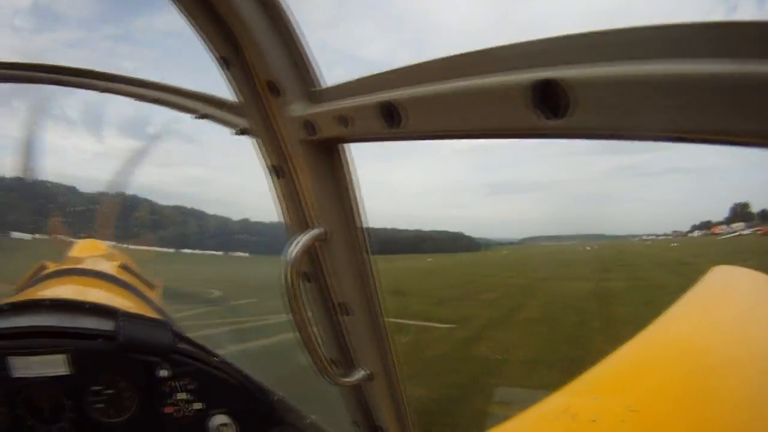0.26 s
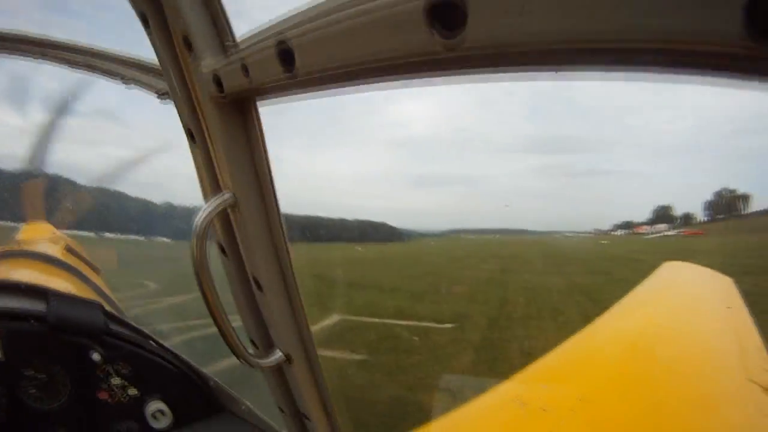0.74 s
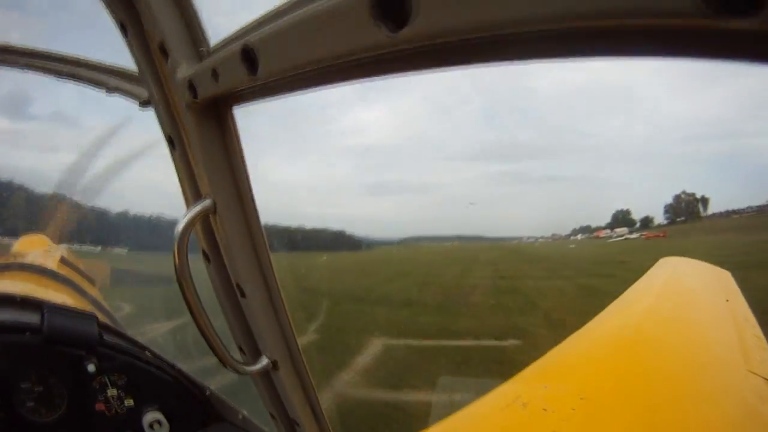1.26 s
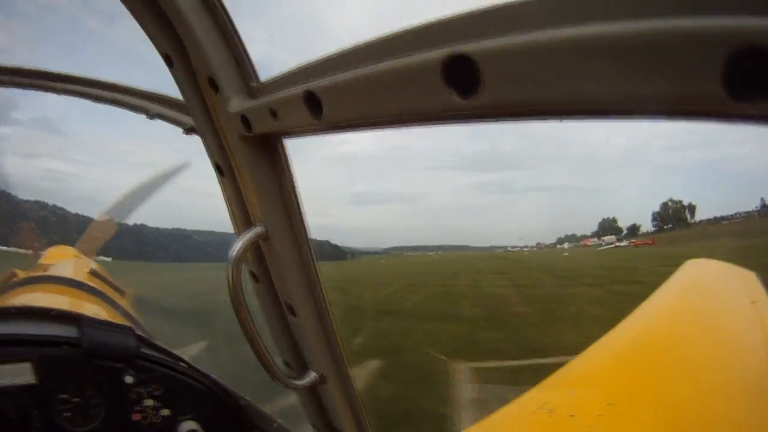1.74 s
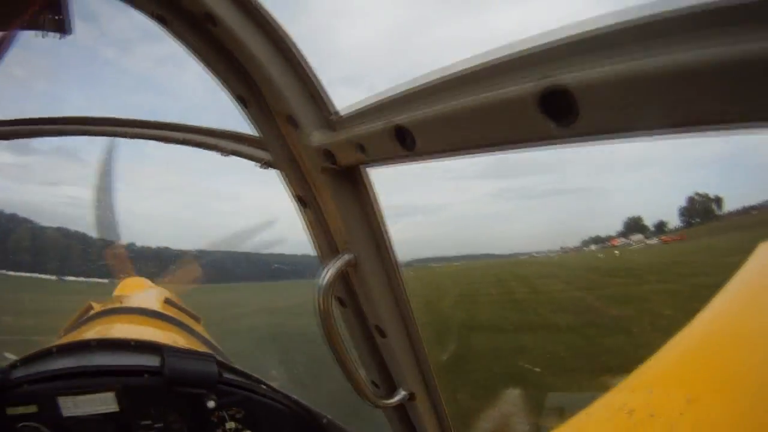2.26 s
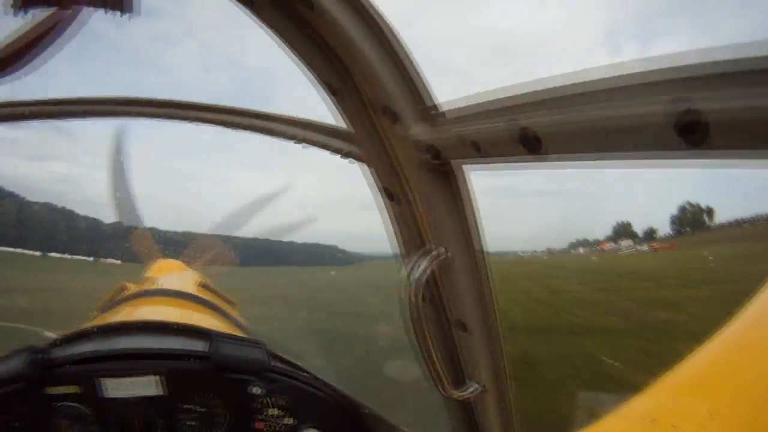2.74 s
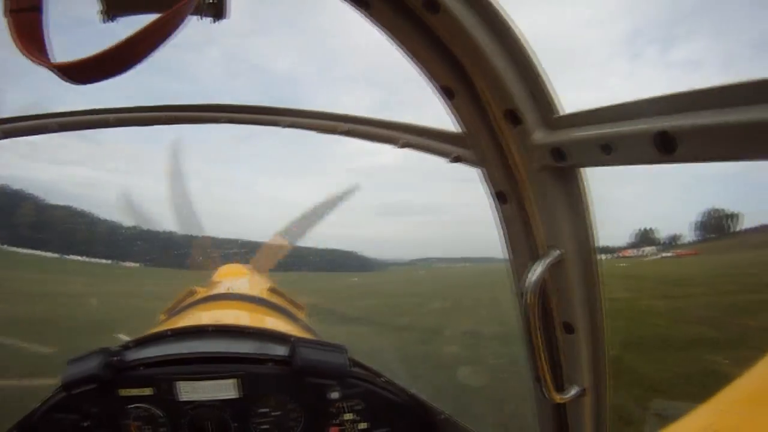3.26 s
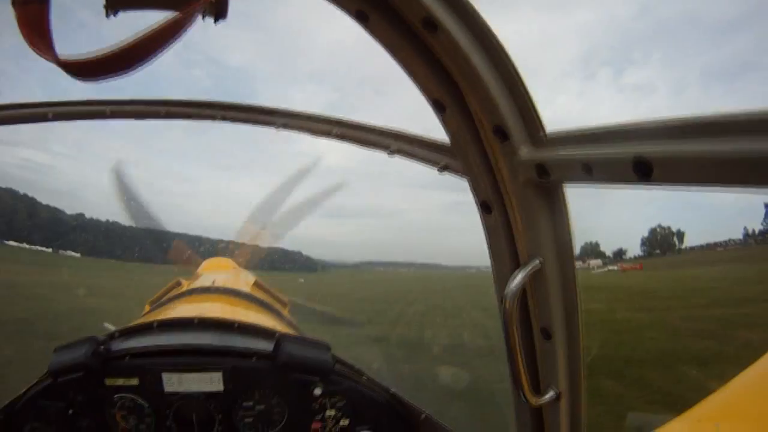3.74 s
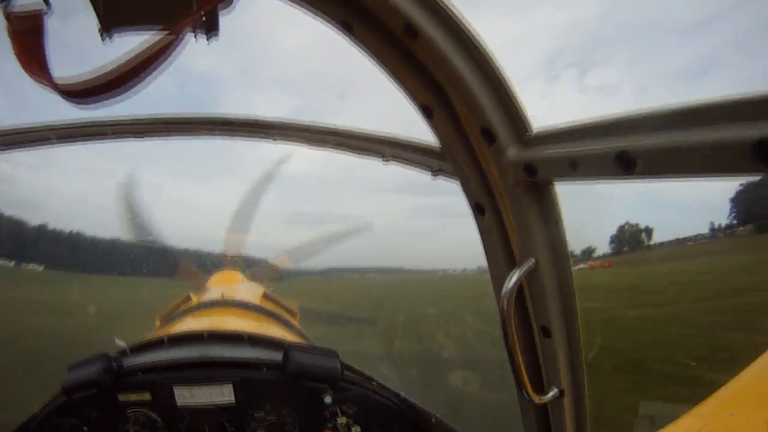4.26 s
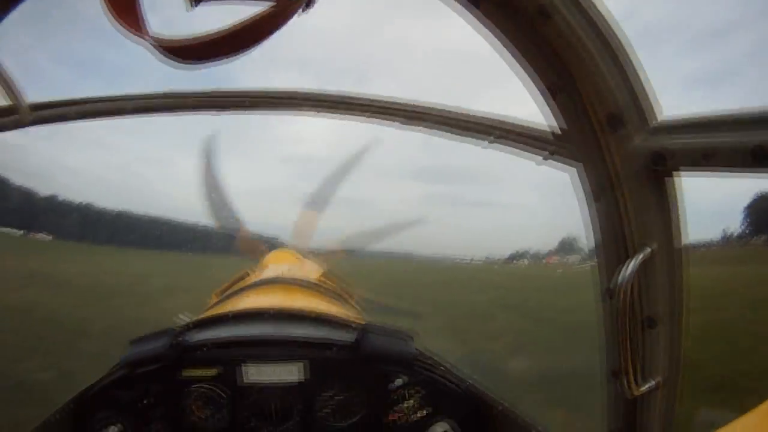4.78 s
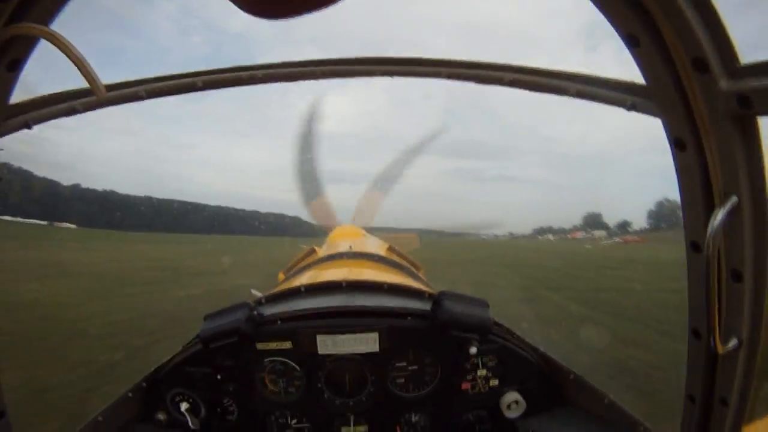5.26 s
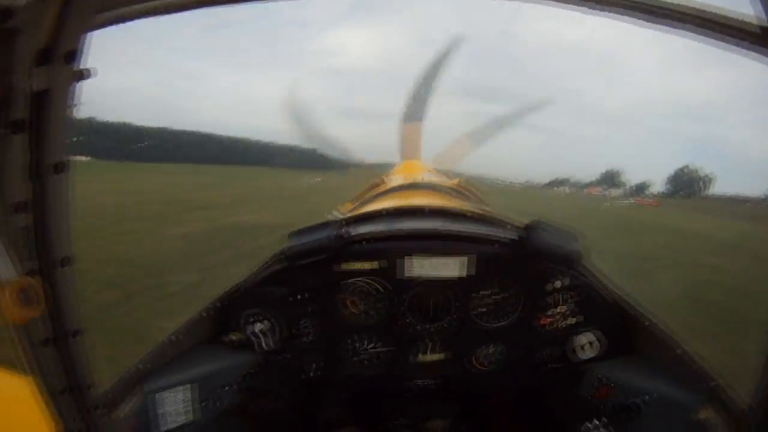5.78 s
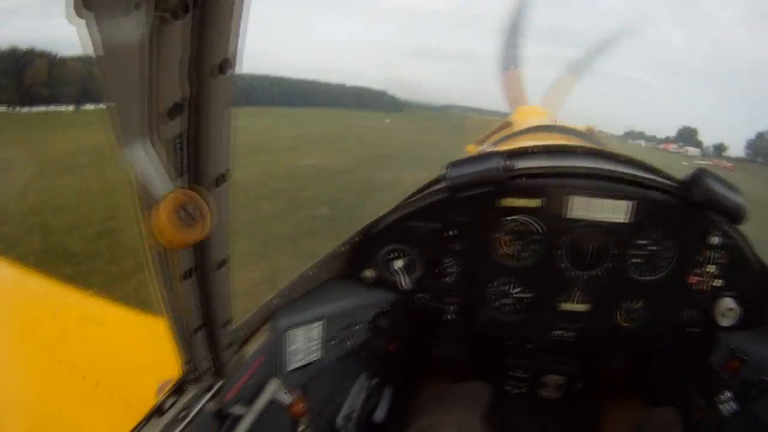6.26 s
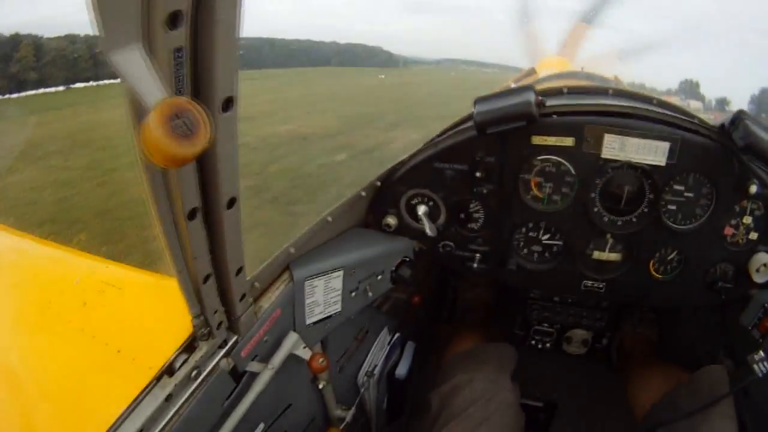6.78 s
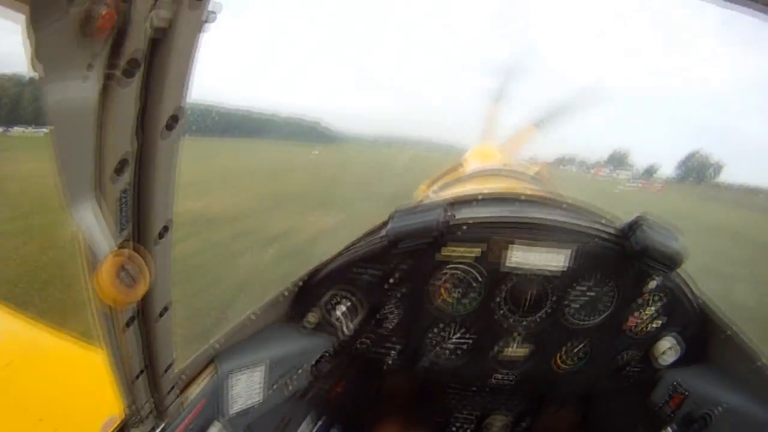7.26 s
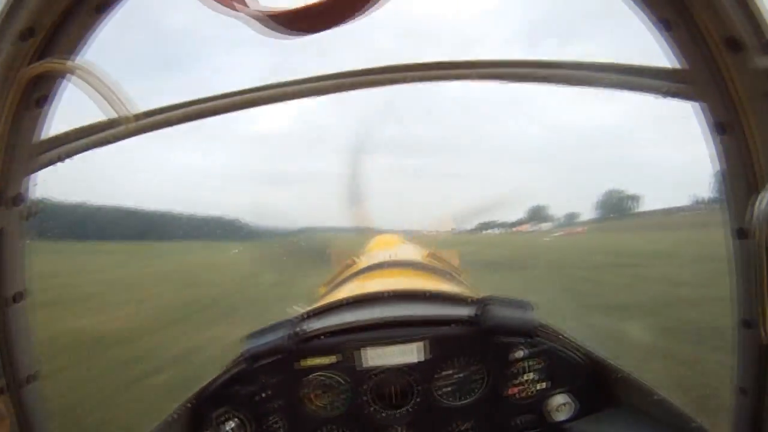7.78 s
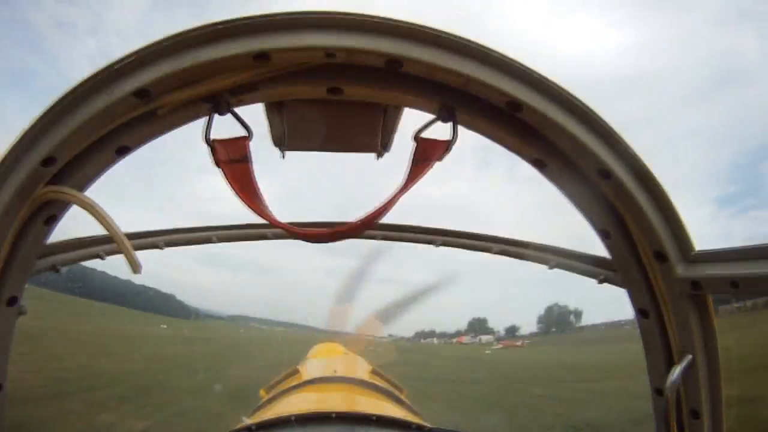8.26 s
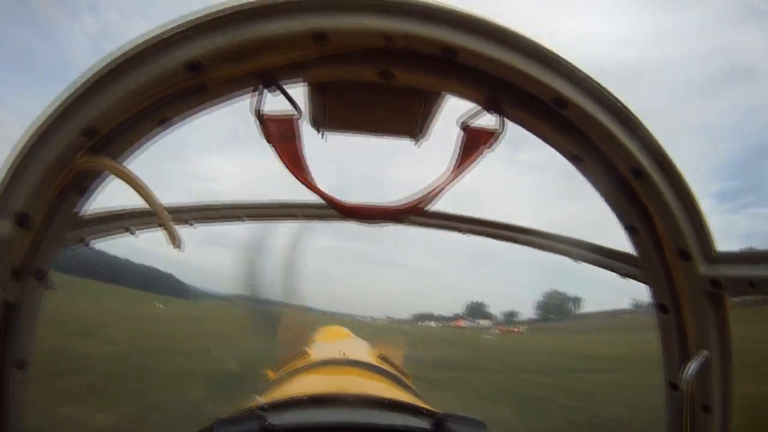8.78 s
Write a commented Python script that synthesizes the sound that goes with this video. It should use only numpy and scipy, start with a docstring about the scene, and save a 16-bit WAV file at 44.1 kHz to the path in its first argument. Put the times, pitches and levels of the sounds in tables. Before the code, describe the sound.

Cockpit of a radial-engined light plane: throbbing propeller beat, gusty air, rumbling wheels and canopy rattles, with the engine opening up in the last second.

```python
"""Heavy propeller thumps in the cabin of a radial-engined light plane taxiing over grass; it idles, then opens up.
Blade clicks excite the cabin and gate noise into gusts; nine uneven firings per cycle give throb and rasp.
The cowling knocks, a drone grows under load, wheels rumble, the loose canopy chatters and a fitting tinkles.
A slow sample-and-hold mirrors the whole mix into the treble as fizz."""
import sys
import numpy as np
from scipy import signal
from scipy.io import wavfile
from scipy.ndimage import uniform_filter1d

SR = 44100
rng = np.random.default_rng(int(sys.argv[2]) if len(sys.argv) > 2 else 0)


def unload_audio(sound):
    """Save the sound as a 16-bit wav file, at the path given as the first command line argument."""
    columns = np.transpose(np.atleast_2d(sound))
    # keep every value between -1 and 1, then stretch to whole-number steps
    steps = np.round(np.clip(columns, -1, 1) * 32767)
    wavfile.write(sys.argv[1], SR, steps.astype(np.int16))


N = 397782
TIME_S = np.arange(N) / SR

# propeller speed: t/s, blade rate/(passes per s)
BLADE_RATE = [(0.0, 35.38), (0.84, 35.0), (1.28, 28.4), (1.6, 25.52), (1.94, 23.94), (3.44, 21.77),
              (3.85, 22.2), (4.3, 33.56), (4.53, 34.11), (4.78, 31.95), (5.29, 33.94), (5.89, 34.86),
              (6.09, 36.11), (6.49, 36.04), (7.12, 37.04), (8.35, 38.07), (8.78, 52.8), (9.02, 58.42)]
TAXI_RATE_HZ = 35
# how far the listener faces the side window: t/s, share/0-1
FACING_SIDE = [(0, 1), (1.0, 1), (2.6, 0.95), (4.6, 0.42), (5.7, 0.57), (6.2, 0.5), (9.02, 0)]

# wheel rumble over the turf, humps apart: t/s, level/dB
TURF_LEVEL = [(0, -29.5), (2.2, -28), (3.4, -32.5), (5.5, -27), (6.2, -47), (9.02, -28)]
# humps under the wheels: t/s, half length/s, extra rumble/dB
HUMPS = [(1.04, .15, 7), (1.6, .12, 5), (2.7, .17, 6), (4.58, .15, 7)]
# airframe boom, relative spectrum: f/Hz, level/dB
RUMBLE_SPECTRUM = [(12, -25), (22, -8), (34, -15.5), (46, -2), (60, -16.5), (150, -15.5), (260, -17.5),
                   (500, -17.5), (800, -40), (2000, -74)]

# canopy rattles at set moments, ahead of colouring and RATTLE_GAIN_DB: t/s, level/dB, ringing f/Hz
RATTLES = [(1.3234, -24.5, 2870), (1.3897, -28, 2830), (1.423, -19, 2800), (1.4571, -21, 2140),
           (1.4884, -25.5, 2830), (2.2953, -29, 3320), (2.5555, -30, 2820), (2.596, -30.5, 2820),
           (3.041, -28, 2350), (3.2196, -27.5, 2260), (4.581, -27, 3130), (5.309, -27, 2000),
           (5.3887, -26.5, 1570), (5.7394, -25, 2700), (5.8538, -25.5, 2160), (6.227, -28, 1300),
           (6.4482, -28, 3480), (6.559, -32, 1290), (6.8877, -27.5, 2960), (7.214, -29, 2880)]
# canopy chatter, relative spectrum: f/Hz, level/dB
RATTLE_SPECTRUM = [(400, -12), (1000, -3.5), (1400, 2), (2200, 0), (2900, -2.5), (3600, 0), (4300, -2.5),
                   (4900, 1.5), (5600, -5.5)]
RATTLE_RISE_S, RATTLE_DECAY_S, RATTLE_RING, RATTLE_GAIN_DB = 0.0018, 0.013, 0.31, 0.5
# lighter rattles from some blade passes: stretch, share of passes, ranges of level (ahead of gain) and pitch
SHAKY_S, SHAKE_SHARE, SHAKE_DB, SHAKE_HZ = (1.6, 7.6), .12, (-35.5, -26), (1940, 3240)
# small loose metal fitting: t/s, level/dB
TINKLES = [(4.83, -41), (4.95, -39), (5.08, -50), (5.54, -37), (5.657, -31), (6.225, -39), (6.78, -30)]
TINKLE_HZ = 4940

# air past the canopy, relative spectrum: f/Hz, level/dB
WASH_SPECTRUM = [(300, -15), (800, -10.5), (1100, -4.5), (1320, -3.5), (1550, -5.5), (1800, 1), (2250, 2),
                 (2550, -3), (2880, 2.5), (3300, -2.5), (3700, -5), (4300, -9.5), (4800, -6.5),
                 (5500, -8.5)]
# slow drift of the wash: t/s, level/dB
WASH_DRIFT = [(0, -2.5), (.8, -4.5), (2.2, -2), (5.2, 0.7), (7.6, 0), (8.1, -0.5), (9.02, 1.5)]
# panel buzzing in the wash, gain at PANEL_HZ: t/s, gain/dB
PANEL_BUZZ = [(0, -6.5), (4.4, 1), (5.3, 7), (6.2, 5), (7, 3), (8.3, 0), (9.02, -4)]
PANEL_HZ = 1370

# four blade passes of one engine cycle: gust level/dB, knock level/dB
CYCLE = [(-2, -3), (.5, 2.5), (2, -3), (-.5, 1)]
# cowling knock, relative spectrum: f/Hz, level/dB
KNOCK_SPECTRUM = [(120, -56.5), (260, -1), (340, 1), (400, 1), (460, 5), (560, -3.5), (640, -11.5),
                  (760, -36.5), (950, -34), (2000, -50)]
# cylinders in firing order: strength/dB, pipe delay/ms
CYLINDERS = [(2, 0), (-3, 3.1), (3, 5.2), (-2, 1.2), (-4, 6.4), (1, 2.3), (-1, .4), (3, 5.8), (-3, 3.9)]
# exhaust throb, relative spectrum: f/Hz, level/dB
THROB_SPECTRUM = [(20, -43.5), (40, -16), (65, 1.5), (120, 1), (190, -3), (260, -4), (320, -18.5),
                  (470, -15), (600, -22), (780, -44), (1500, -57.5)]
# exhaust rasp, relative spectrum: f/Hz, level/dB
RASP_SPECTRUM = [(400, -24.5), (620, 7), (760, 2.5), (900, -1.5), (1150, -3.5), (1600, -5.5), (3000, -18),
                 (5500, -46)]
# brief exhaust flares: t/s, half length/s, extra rasp/dB
FLARES = [(1.06, .09, 4), (2.4, 0.16, 3.5), (3.3, 0.1, 4.5), (4.0, .18, 1)]

# cabin response to a blade, facing the side window: f/Hz, level/dB
CABIN_SIDE = [(14, -19), (35, -1.5), (70, -9), (106, -6), (141, -1.5), (176, 3), (211, -16.5), (247, 0),
              (285, -15), (420, -18.5), (565, -20.5), (700, -42.5), (1500, -66)]
# cabin response to a blade, facing ahead: f/Hz, level/dB
CABIN_AHEAD = [(14, -27), (36, -10.5), (58, -0.5), (76, -3.5), (112, 1), (148, -2.5), (185, -1.5),
               (228, -4.5), (275, -7.5), (320, -18.5), (415, -20), (540, -25), (700, -39), (1500, -64)]
# cabin air modes that draw out a thump: f/Hz, width/Hz
CABIN_MODES = [(140, 36), (245, 45)]

# Level laws, one row each: base level at taxi speed/dB, speed slope/(dB per octave),
# speeding up/(dB per octave/s), slowing down/(dB per octave/s), extra when facing the side window/dB
# propeller thump
BLADE_LAW = (-21.5, 5, -1, -3.5, 0.8)
# propeller drone
HUM_LAW = (-42.5, 4, 15, 0, -10)
# exhaust throb
THROB_LAW = (-22.5, -3.5, 1.5, 0, 0)
# exhaust rasp
RASP_LAW = (-48, 2, 6.5, -1, 5)
# cowling knock
KNOCK_LAW = (-30.5, 1.7, 3.5, -4.5, -0.1)
# wash
WASH_LAW = (-36, 3, 3.5, 3.5, 0.7)
# the throttle moves ahead of the shaft and takes a moment to move
THROTTLE_LEAD_S, THROTTLE_MOVE_S = 0.057, 0.23
# the cabin rings up slowly: early pulses make the thump land with knock and gust
THUMP_LEAD_S, KNOCK_LEAD_S = .012, .004

HOLD_RATE_HZ, BAND_EDGE_HZ = 12000, 15280


def amp(db):
    """Decibels to gain."""
    return 10 ** (np.asarray(db) / 20)


def unit(x):
    """Scales to rms 1."""
    return x / np.sqrt(np.mean(x ** 2) + 1e-20)


def steady(x):
    """Evens out the slow level, keeping the single beats."""
    power = uniform_filter1d(uniform_filter1d(x ** 2, size=9000), size=9000)
    return x / np.sqrt(power + 1e-12)


def curves(rows):
    """Interpolates each column of a table over time."""
    t_s, *columns = np.transpose(rows)
    return [np.interp(TIME_S, t_s, column) for column in columns]


def swells(rows):
    """Gain that rises and falls smoothly around each listed moment."""
    return amp(sum(db * np.exp(-((TIME_S - t_s) / half_s) ** 2) for t_s, half_s, db in rows))


def wander(rate):
    """Slow random curve of rms 1, with rate knots per second."""
    knots = rng.standard_normal(N // 50)
    return unit(np.interp(TIME_S * rate, np.arange(len(knots)), knots))


def colour(x, spectrum):
    """Minimum-phase filter with the given spectrum; output rms 1."""
    hz, db = np.transpose(spectrum)
    size = 8192
    bins_hz = abs(np.fft.fftfreq(size, 1 / SR))
    log_gain = np.log(amp(np.interp(np.log(bins_hz + 1), np.log(hz), db)))
    response = np.exp(np.conj(signal.hilbert(log_gain)))
    taps = np.fft.ifft(response).real[:size // 2]
    return unit(signal.oaconvolve(x, taps)[:N])


def pass_starts(turns):
    """Sample indices just ahead of each whole turn."""
    return np.flatnonzero(np.diff(np.floor(turns)) > 0)


def beats(turns, pattern_db, uneven_db, jitter_s, delay_ms=0):
    """One click per whole turn, sized and delayed by a repeating pattern and by chance."""
    at = pass_starts(turns)
    size, late = rng.standard_normal((len(at), 2)).T
    step = np.floor(turns[at + 1]).astype(int) % len(pattern_db)
    pattern_delay_ms = delay_ms * np.ones(len(pattern_db))
    delay_s = late * jitter_s + pattern_delay_ms[step] / 1000
    where = np.clip(at + np.round(delay_s * SR).astype(int), 0, N - 1)
    return np.bincount(where, amp(np.asarray(pattern_db)[step] + uneven_db * size), N)


def puffs(clicks, rise_s, decay_s):
    """Envelope in which every click swells and dies away."""
    t_s = TIME_S[:SR // 5]
    shape = (1 - np.exp(-t_s / rise_s)) * np.exp(-t_s / decay_s)
    return signal.oaconvolve(clicks, shape / shape.max())[:N]


def ring_on(x):
    """Cabin modes as all-pass filters: sound near each pitch is delayed, its spectrum unchanged."""
    for hz, width_hz in CABIN_MODES:
        r = np.exp(-np.pi * width_hz / SR)
        poles = [1, -2 * r * np.cos(2 * np.pi * hz / SR), r * r]
        x = signal.lfilter(poles[::-1], poles, x)
    return x


def follow(law, speed):
    """Gain from shaft speed, throttle movement and the turn of the head."""
    taxi_db, octave_db, opening_db, closing_db, side_db = law
    octaves = np.log2(speed / TAXI_RATE_HZ)
    change = np.gradient(octaves) * SR
    change = uniform_filter1d(change, size=max(round(THROTTLE_MOVE_S * SR), 1))
    change = np.interp(TIME_S + THROTTLE_LEAD_S, TIME_S, change)
    throttle_db = opening_db * np.maximum(change, 0) + closing_db * np.maximum(-change, 0)
    return amp(taxi_db + octave_db * octaves + throttle_db + side_db * curves(FACING_SIDE)[0])


def add(mix, t_s, sound):
    """Lays a sound into the mix at t_s."""
    part = mix[round(t_s * SR):][:len(sound)]
    part += sound[:len(part)]


def ground():
    """Wheels on lumpy turf: noise of wandering level booms in the airframe, more on the humps."""
    lumps = rng.standard_normal(N) * amp(2.5 * wander(14))
    boom = steady(colour(lumps, RUMBLE_SPECTRUM))
    return amp(curves(TURF_LEVEL)[0]) * swells(HUMPS) * boom


def chatter(hz, width_hz, ring, decay_s):
    """A burst of tiny impacts, part of it ringing at one pitch."""
    t_s = TIME_S[:SR // 10]
    impacts = rng.standard_normal(len(t_s)) * (rng.random(len(t_s)) < .2)
    b, a = signal.iirpeak(hz, hz / width_hz, fs=SR)
    sound = unit(unit(impacts) + ring * unit(signal.lfilter(b, a, impacts)))
    attack = 1 - np.exp(-t_s / RATTLE_RISE_S)
    return sound * attack * np.exp(-t_s / decay_s)


def shaken(turns):
    """Random blade passes shake light rattles loose: rows of t/s, level/dB, ringing f/Hz."""
    passes_s = TIME_S[pass_starts(turns)]
    chance, size, pitch = rng.random((len(passes_s), 3)).T
    level_db = np.interp(size, [0, 1], SHAKE_DB)
    ring_hz = np.interp(pitch, [0, 1], SHAKE_HZ)
    rows = np.transpose([passes_s, level_db, ring_hz])
    in_stretch = (passes_s > SHAKY_S[0]) & (passes_s < SHAKY_S[1])
    return list(rows[(chance < SHAKE_SHARE) & in_stretch])


def canopy(turns):
    """Jolts make the loose canopy chatter and a metal fitting tinkle, as bursts of ringing impacts."""
    out = np.zeros(N)
    for t_s, db, hz in list(RATTLES) + shaken(turns):
        add(out, t_s, amp(db) * chatter(hz, width_hz=170, ring=RATTLE_RING, decay_s=RATTLE_DECAY_S))
    out = colour(out, RATTLE_SPECTRUM) * np.std(out) * amp(RATTLE_GAIN_DB)
    for t_s, db in TINKLES:
        add(out, t_s, amp(db) * chatter(TINKLE_HZ, width_hz=140, ring=5, decay_s=.015))
    return out


def wash(turns, speed):
    """Air chopped by the blades: separate gusts at idle, a smoother, brighter rush at speed."""
    gust_db = np.transpose(CYCLE)[0]
    clicks = beats(turns + .1, gust_db, uneven_db=1.8, jitter_s=.001)
    gusts = unit(puffs(clicks, rise_s=0.0041, decay_s=0.016)) + 0.77 * speed / TAXI_RATE_HZ
    ticks = (rng.random(N) < 500 / SR) * rng.standard_normal(N)  # about 500 per s
    air = unit(rng.standard_normal(N) + 0.48 * unit(ticks))
    hz, t_s, bins = signal.stft(gusts * air, SR, nperseg=512)
    # random patches in time and pitch: every gust stirs other parts of the frame
    patches = uniform_filter1d(rng.standard_normal(bins.shape), size=3, axis=0)
    patches = unit(uniform_filter1d(patches, size=7, axis=1))
    panel_shape = np.exp(-((hz - PANEL_HZ) / 220) ** 2)
    buzz_db = np.outer(panel_shape, np.interp(t_s, TIME_S, curves(PANEL_BUZZ)[0]))
    octaves = np.log2(np.interp(t_s, TIME_S, speed) / TAXI_RATE_HZ)
    bright_db = np.outer(np.clip((hz - 3000) / 2500, 0, 1), 4 * octaves)
    shaped = bins * amp(2.66 * patches + buzz_db + bright_db)
    rush = signal.istft(shaped, SR, nperseg=512)[1][:N]
    return steady(colour(rush, WASH_SPECTRUM))


def cowling(turns):
    """Each blade pass knocks and shudders the cowling, hardest once per crank turn: clicks and gated noise."""
    knock_db = np.transpose(CYCLE)[1]
    clicks = beats(turns + .01, knock_db, uneven_db=1.6, jitter_s=.00015)
    shudder = (unit(puffs(clicks, rise_s=.0006, decay_s=.009)) + .85) * rng.standard_normal(N)
    return steady(colour(unit(shudder) - .65 * unit(clicks), KNOCK_SPECTRUM))


def exhaust(turns):
    """Nine uneven firings per four blade passes: a low throb and a gated rasp."""
    firings = (turns - .1) * len(CYLINDERS) / len(CYCLE)
    strength_db, pipe_ms = np.transpose(CYLINDERS)
    clicks = beats(firings, strength_db, uneven_db=3, jitter_s=.0008, delay_ms=pipe_ms)
    gas = (unit(puffs(clicks, rise_s=0.0004, decay_s=0.011)) + 0.76) * rng.standard_normal(N)
    throb = colour(unit(clicks) + .65 * unit(gas), THROB_SPECTRUM)
    return steady(ring_on(throb)), steady(colour(gas, RASP_SPECTRUM))


def hum(turns):
    """Under load the propeller adds a clean drone an octave above the blade rate."""
    return unit(np.cos(2 * np.pi * 2 * turns))


def propeller(turns):
    """Each blade sucks at the canopy and rings the cabin, whose response shifts as the head turns."""
    clicks = beats(turns, [0], uneven_db=.9, jitter_s=.00003)
    side = np.clip(curves(FACING_SIDE)[0], 0, 1)
    thump = side * colour(clicks, CABIN_SIDE) + (1 - side) * colour(clicks, CABIN_AHEAD)
    return -steady(ring_on(thump))  # minus: suction


def scene():
    """One shaft speed drives propeller, drone, exhaust, knock and wash."""
    speed, = curves(BLADE_RATE)
    turns = np.cumsum(speed) / SR - .09  # blade passes
    thump_turns = turns + speed * THUMP_LEAD_S
    knock_turns = turns + speed * KNOCK_LEAD_S
    throb, rasp = exhaust(thump_turns)
    mix = ground() + canopy(knock_turns)
    mix += follow(WASH_LAW, speed) * amp(curves(WASH_DRIFT)[0]) * wash(turns, speed)
    mix += follow(KNOCK_LAW, speed) * cowling(knock_turns)
    mix += follow(THROB_LAW, speed) * throb
    mix += follow(RASP_LAW, speed) * swells(FLARES) * rasp
    mix += follow(HUM_LAW, speed) * hum(turns)
    mix += follow(BLADE_LAW, speed) * propeller(thump_turns)
    return mix[None]


def record(dry):
    """Slow sampling, each sample held four times, mirrors the sound into the treble; then a band limit."""
    guard = signal.firwin(61, 5500, fs=SR)
    slow = signal.resample(np.convolve(dry[0], guard, "same"), round(N * HOLD_RATE_HZ / SR))
    held = signal.resample(np.repeat(slow, 4), N)
    band = signal.firwin(511, BAND_EDGE_HZ, window=("kaiser", 9), fs=SR)
    return signal.oaconvolve(held, band, "same")[None]


dry = scene()
out = record(dry)
unload_audio(out)
```